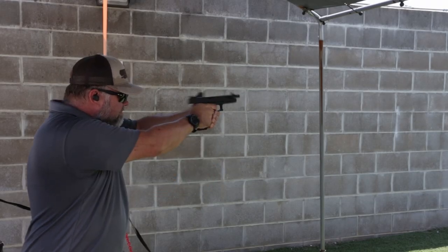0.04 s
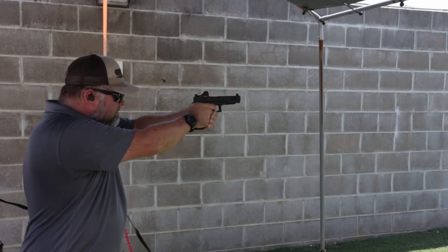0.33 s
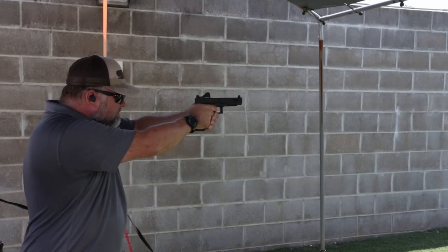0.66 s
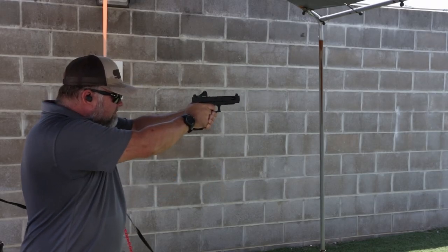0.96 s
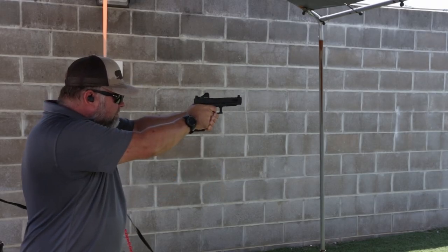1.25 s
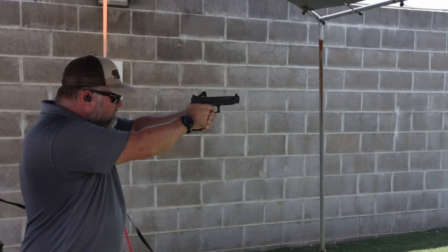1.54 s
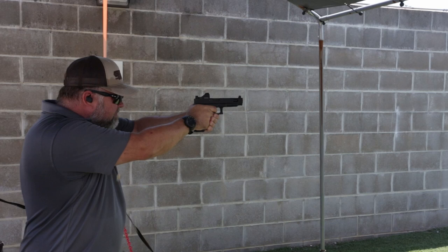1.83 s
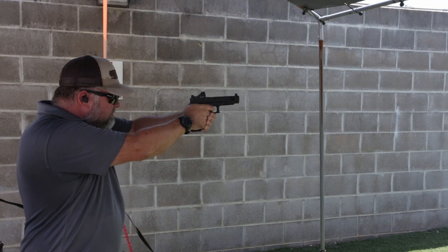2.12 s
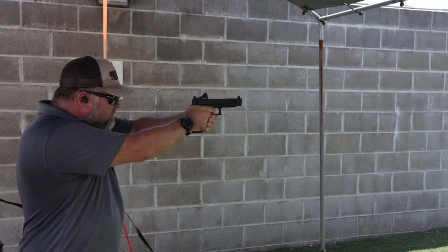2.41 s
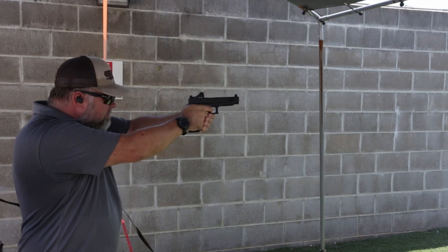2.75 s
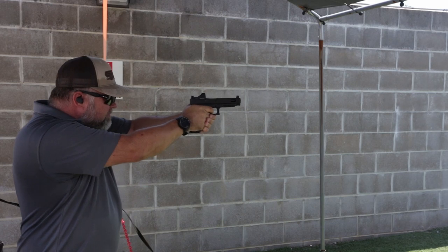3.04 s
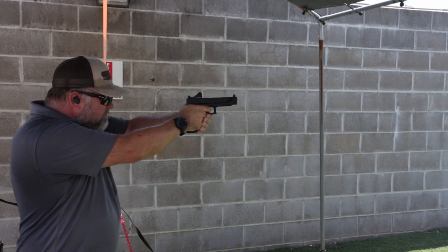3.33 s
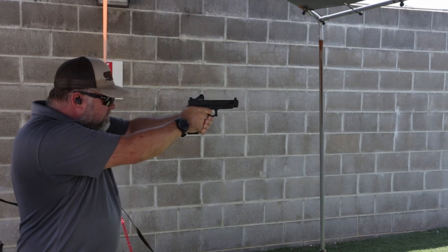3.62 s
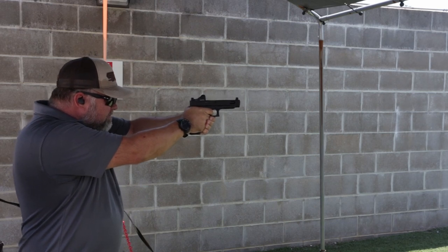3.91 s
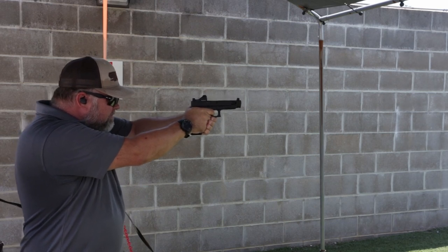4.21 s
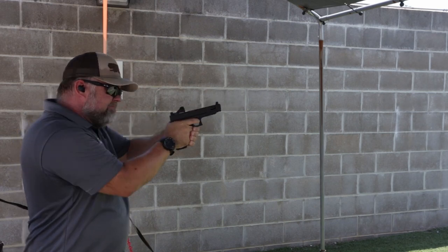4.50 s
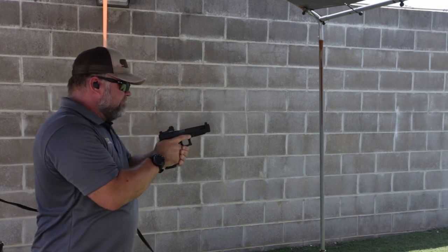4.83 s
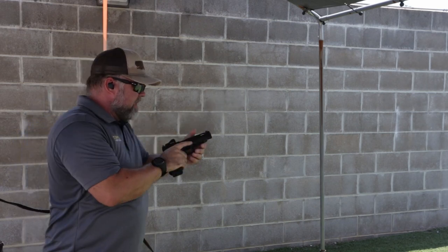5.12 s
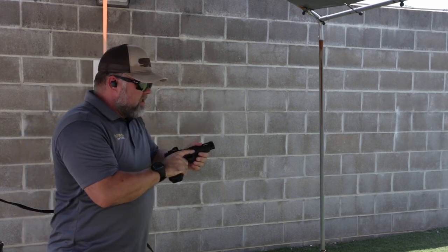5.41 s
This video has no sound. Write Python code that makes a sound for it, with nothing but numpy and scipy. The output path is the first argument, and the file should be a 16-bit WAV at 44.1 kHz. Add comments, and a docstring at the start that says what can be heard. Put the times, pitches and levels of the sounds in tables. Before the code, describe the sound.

A pistol fires six loud shots at a steady pace at a roofed outdoor range, each overloading the close microphone and echoing briefly off a wall. After every shot but the fifth, a steel plate rings, clanks onto its rack and bounces once. Then brass cases tinkle faintly on the ground, and the pistol is handled with a few soft knocks and a rub in light wind.

```python
"""Outdoor range, under a roof beside a block wall: six pistol shots at a rack of steel plates.
Five plates are hit: each rings while it tips over, clanks onto the rack and bounces once.
Brass cases tinkle on the ground, then the pistol is lowered and handled in a light wind.
The blasts overload the microphone and pull its gain control down."""
import sys
import numpy as np
from scipy import signal
from scipy.fft import irfft
from scipy.io import wavfile
from scipy.ndimage import map_coordinates

SR = 44100
rng = np.random.default_rng(int(sys.argv[2]) if len(sys.argv) > 2 else 0)


def to_wav(s):
    """Save 16-bit WAV."""
    ch = np.atleast_2d(s).T  # columns
    pcm = np.round(np.clip(ch, -1, 1) * 32767)  # PCM
    wavfile.write(sys.argv[1], SR, pcm.astype(np.int16))


N = 245195
TIME = np.arange(N) / SR

# Plates meeting the rack, landing and bounce in turn. Each row: start in s, crash level in dB, rise in s,
# t60 in s, clang in Hz, clang in dB re crash, plate's low mode in dB, upper modes in dB.
RACK_IMPACTS = [(.44, -16.5, 0.0016, 0.42, 9060, -18, -22, -30),
                (.572, -22.5, .011, 0.63, 9050, -27.5, -30, -28),
                (1.093, -17, .002, 0.45, 7430, -11, -27, -28.5),
                (1.195, -23, 0.0061, 0.53, 2380, -10.5, -28, -26.5),
                (1.659, -21.5, .0023, 0.6, 11520, -23, -18.5, -27.5),
                (1.78, -26.5, 0.0061, 0.33, 4050, -24, -32.5, -30.5),
                (2.264, -18, 0.0016, .36, 2710, -11.5, -24.5, -23.5),
                (2.376, -23, 0.021, 0.35, 7440, -15.5, -41.5, -39),
                (3.369, -19.5, 0.0028, 0.56, 7420, -17, -31, -28),
                (3.529, -26.5, .0055, 0.41, 2490, -14, -34, -30.5)]


def shots(blast_t60_s=0.21, puff_t60_s=0.011, puff_delay_s=0.0011, puff_push=0.22,
          reverb_db=-3, lumpy_db=1.5, chirp_db=-9, roof_db=-33, roof_t60_s=1.225):
    """Muzzle blast with dense near reflections and a swinging gas puff; range, wall and roof answer."""
    # Each row: start in s, blast in dB, tail in dB, puff in dB re blast, puff swing in Hz.
    rounds = [(0.0733, 5, -3, 2.5, 292), (0.761, 8, -2.5, 16, 199.4), (1.3834, 10, -5, 11.5, 180),
              (1.9928, 8.5, -4, 12.5, 310), (2.5635, 6.5, -4.5, 1, 404), (3.1310, 8, -2.5, -0.5, 404)]
    # Spectra. Each row: frequency in Hz, relative density in dB.
    blast_spectrum = [(40, -17), (150, -9.5), (400, -2.5), (900, -1.5), (2000, -3.5), (4000, -6.5),
                      (8000, -16.5), (16000, -41.5)]
    reverb_spectrum = [(40, -30), (120, -32.5), (250, 1), (600, 5.5), (1000, -1), (1500, -9), (2800, -9.5),
                       (5000, -12), (9000, -11), (16000, -17.5)]
    roof_spectrum = [(50, -23.5), (110, -6.5), (170, -2.5), (260, -4.5), (500, -29.5), (2000, -59)]
    # Decay of the range. Each row: frequency in Hz, t60 in s.
    reverb_decay = [(60, .4), (200, 0.33), (600, 0.43), (2500, 0.72), (6000, 0.51), (15000, 0.28)]
    out, t = np.zeros(N), TIME[:SR]
    for start_s, blast_db, tail_db, puff_db, puff_hz in rounds:
        blast = from_db(blast_db) * noise(blast_spectrum, SR) * fade(t, blast_t60_s)
        swing = np.sin(2 * np.pi * puff_hz * t) + puff_push
        puff = -from_db(blast_db + puff_db) * swing * fade(t, puff_t60_s)
        reverb = from_db(reverb_db + lumpy_db * drift(90, SR)) * noise(reverb_spectrum, SR, reverb_decay)
        chirp = from_db(chirp_db) * wall_chirp(t)
        roof = from_db(roof_db) * noise(roof_spectrum, SR) * fade(t, roof_t60_s)
        add(out, start_s, blast + from_db(tail_db) * (reverb + chirp + roof))
        add(out, start_s + puff_delay_s, puff)
    return out


def wall_chirp(t, start_hz=2198, end_hz=266.2, glide_s=0.068, width_hz=330, t60_s=0.48):
    """Rows of blocks scatter the blast back ever more obliquely: an echo that sinks in pitch."""
    hz = end_hz + (start_hz - end_hz) * np.exp(-t / glide_s)
    scatter = drift(width_hz, len(t)) + 1j * drift(width_hz, len(t))
    return np.real(scatter * np.exp(2j * np.pi * np.cumsum(hz) / SR)) * swell(t, glide_s, t60_s)


def plates(strike_rise_s=0.004, low_lobes=2.15, edge_on_db=5, upper_offset_lobes=0.19,
           landed_t60_s=0.17, settle_s=0.045, rest_t60_s=0.17, high_db=-38, top_db=-42):
    """A bullet rings a plate and tips it at a steady rate, sweeping its lobes past the microphone."""
    # Each row: low mode, upper mode and its twin in Hz, twin in dB re upper, high and top modes in Hz.
    plate_modes = [(2964, 4800, 4875, -8, 7400, 10460), (2820, 4870, 4745, -1.5, 7397, 10240),
                   (2911, 4806, 4830, -4.5, 7698, 10300), (2908, 4885, 4655, -4, 7480, 10440),
                   (2870, 4820, 5700, -11, 7920, 10380)]
    # Each row: start in s, low mode in dB, its t60 in s, upper modes in dB, their t60 in s,
    # upper lobes passing during the fall, roughness 0-1.
    bullet_hits = [(.148, -22, 1.57, -26, 2.4, 1.3, 0.28), (.834, -25.5, 1.74, -17.5, 1.1, 2.61, 0.3),
                   (1.466, -22, 1.2, -12.5, 3, 1.4, 0.4), (2.072, -33, .4, -14.5, .6, 2.32, 0.48),
                   (3.2, -26, .2, -19.5, .36, 1.1, 0.7)]
    out, t = np.zeros(N), TIME[:SR]
    for modes, hit, landing, bounce in zip(plate_modes, bullet_hits, RACK_IMPACTS[::2],
                                           RACK_IMPACTS[1::2]):
        low_hz, upper_hz, twin_hz, twin_db, high_hz, top_hz = modes
        start_s, low_db, low_t60_s, upper_db, upper_t60_s, upper_lobes, rough = hit
        fall_s = landing[0] - start_s
        tipped = np.minimum(t / fall_s, 1)   # 0 upright, 1 down on the rack
        rack_damping = fade(np.maximum(t - fall_s, 0), landed_t60_s)
        low_beam = lobes(low_lobes * tipped, gap_db=-10) * from_db(edge_on_db * tipped ** 2)
        upper_beam = lobes(upper_lobes * tipped - upper_offset_lobes, gap_db=-13)
        low_env = from_db(low_db) * swell(t, strike_rise_s, low_t60_s) * low_beam * rack_damping
        upper_env = from_db(upper_db) * swell(t, strike_rise_s, upper_t60_s) * upper_beam * rack_damping
        # Landing and bounce restrike the low mode and shake the upper modes of all five plates.
        shaken_env = 0
        for touch_s, *_, restrike_db, shake_db in (landing, bounce):
            since_s = start_s + t - touch_s
            restrike = from_db(restrike_db) * swell(since_s, rise_s=0.035, t60_s=0.78)
            shake = from_db(shake_db) * swell(since_s, rise_s=0.018, t60_s=0.55)
            low_env = np.hypot(low_env, restrike)
            shaken_env = np.hypot(shaken_env, shake)
        pair = unit_rms(wavering(upper_hz, rough, SR) + from_db(twin_db) * wavering(twin_hz, rough, SR))
        all_plates = unit_rms(sum(wavering(hz, rough=0.5, size=SR) for _, hz, *_ in plate_modes))
        high = from_db(high_db) * narrow_band(high_hz, 130, SR)
        top = from_db(top_db) * narrow_band(top_hz, 260, SR)
        sheen = (high + top) * fade(t, t60_s=0.69)
        ring = low_env * wavering(low_hz, rough, SR) + upper_env * pair + shaken_env * all_plates + sheen
        settling = fade(np.maximum(start_s + t - bounce[0] - settle_s, 0), rest_t60_s)
        add(out, start_s, ring * settling)
    return out


def lobes(turns, gap_db):
    """A mode radiates in lobes, one per turn; reflections fill the gaps."""
    return np.hypot(np.cos(np.pi * turns), from_db(gap_db))


def wavering(hz, rough, size):
    """Mode of a swinging plate: a sine wavering in level and phase; rms 1."""
    wobble = 1 + rough * (0.5 * drift(90, size) + 1j * drift(70, size))
    return unit_rms(np.real(wobble * np.exp(2j * np.pi * hz * TIME[:size])))


def rack(frame_db=-3, frame_t60_ratio=0.8, rattle_db=-4, rough_db=2.5,
         shimmer_db=-13, shimmer_t60_s=0.31, clang_t60_s=0.42):
    """A plate hits the steel frame: dense frame modes, sparse high shimmer, a rattle and one clang."""
    # Steel on steel, and the rack's high modes. Each row: frequency in Hz, relative level in dB.
    crash_spectrum = [(150, -30), (350, -20), (650, -10), (1300, -3), (2700, 1.5), (4000, -2), (5000, 1),
                      (6500, -13.5), (8000, -6), (10500, -16.5), (13500, -25), (16000, -33.5)]
    shimmer_spectrum = [(5600, 3.5), (8500, -3), (10500, -3.5), (12500, -12.5), (14600, -12.5)]
    size = SR * 2 // 3
    out, t = np.zeros(N), TIME[:size]
    shimmer_hz = np.linspace(5600, 14600, 30) + rng.uniform(-110, 110, 30)
    for start_s, level_db, rise_s, t60_s, clang_hz, clang_db, *_ in RACK_IMPACTS:
        frame_hz = rng.uniform(500, 11000, 130)
        frame = from_db(frame_db) * sines(frame_hz, crash_spectrum, size)
        frame *= fade(t, t60_s * frame_t60_ratio)
        shimmer = from_db(shimmer_db) * sines(shimmer_hz, shimmer_spectrum, size) * fade(t, shimmer_t60_s)
        rattle_env = from_db(rattle_db + rough_db * drift(200, size)) * fade(t, t60_s)
        rattle = rattle_env * noise(crash_spectrum, size, tilt_db_per_oct=-2)
        clang_tone = np.sin(2 * np.pi * clang_hz * t) + 0.81 * narrow_band(clang_hz, 90, size)
        clang = from_db(clang_db) * clang_tone * fade(t, clang_t60_s)
        add(out, start_s, from_db(level_db) * (frame + shimmer + rattle + clang) * rise(t, rise_s))
    return out


def cases(tick_t60_s=0.0084, second_end_db=-5, second_end_s=0.0055, echo_db=-14, echo_t60_s=0.18,
          clink_db=-12, clink_hz=5200, clink_t60_s=0.16, ring_t60_s=0.33, blur=0.87):
    """A brass case lands on one end, then the other, clinks and rings on with one thin high note."""
    # Each row: start in s, tick in dB, ring in dB, ring in Hz, rise in s.
    landings = [(1.589, -44, -64, 9650, .0003), (3.692, -40, -53.5, 10030, 0.0008),
                (3.866, -40, -54, 9880, 0.00038), (4.379, -48.5, -67.5, 9830, 0.01),
                (4.63, -54.5, -55.5, 9850, 0.004), (4.71, -57, -63, 9940, 0.0041),
                (4.757, -49, -55, 9900, 0.03)]
    # Each row: frequency in Hz, relative density in dB.
    tick_spectrum = [(1500, -20.5), (4300, -7), (5300, -0.5), (7500, -13.5), (11000, -6.5), (16000, -22)]
    out, t = np.zeros(N), TIME[:SR // 2]
    second_end = from_db(second_end_db) * (t > second_end_s) * fade(np.abs(t - second_end_s), tick_t60_s)
    tick_env = 2 * (fade(t, tick_t60_s) + second_end) + from_db(echo_db) * fade(t, echo_t60_s)
    for start_s, tick_db, ring_db, ring_hz, rise_s in landings:
        tick = noise(tick_spectrum, len(t)) * tick_env
        clink = from_db(clink_db) * narrow_band(clink_hz, 1200, len(t)) * fade(t, clink_t60_s)
        tone = np.sin(2 * np.pi * ring_hz * t) + blur * narrow_band(ring_hz, 220, len(t))
        ring = from_db(ring_db) * tone * fade(t, ring_t60_s)
        add(out, start_s, (from_db(tick_db) * (tick + clink) + ring) * rise(t, rise_s))
    return out


def knocks(rise_s=0.0041, thud_db=-2, hollow_db=-3):
    """Hollow knocks and clicks of the handled pistol, smeared by wall and roof."""
    # Each row: start in s, level in dB, t60 in s, thud tilt in dB per octave.
    contacts = [(4.198, -51.5, 0.12, -3.5), (4.484, -39, 0.14, -1), (5.165, -58.5, 0.21, 7),
                (5.288, -60, .06, 8), (5.467, -43.5, 0.15, 6.3)]
    # Each row: frequency in Hz, relative density in dB.
    thud_spectrum = [(50, -10.5), (130, 2.5), (400, -15.5), (1000, 1), (2200, -7), (3500, -11.5),
                     (5500, -18), (7500, -32), (16000, -41)]
    # Each row: frequency in Hz, width before broadening in Hz, relative level in dB.
    hollow_modes = [(1038, 45, 11.5), (1320, 50, 6), (1590, 55, 5), (1860, 60, 11.5), (2050, 79, 6),
                    (2480, 28, 6), (3070, 50, 0), (5300, 130, -3)]
    out, t = np.zeros(N), TIME[:SR // 2]
    for start_s, level_db, t60_s, tilt in contacts:
        thud = from_db(thud_db) * noise(thud_spectrum, len(t), tilt_db_per_oct=tilt)
        hollow = from_db(hollow_db) * resonances(hollow_modes, len(t), broadening=3)
        add(out, start_s, from_db(level_db) * (thud + hollow) * swell(t, rise_s, t60_s))
    return out


def scrape(start_s=5.165, level_db=-67.5, grain_db=2, stroke_db=2):
    """Hands rub over the pistol and excite its resonances."""
    # Each row: frequency in Hz, width in Hz, relative level in dB.
    pistol_modes = [(1880, 260, 2.5), (2350, 380, 0.5), (3710, 450, -4), (4980, 800, -5.5), (5600, 900, -6),
                    (7450, 3000, -8)]
    friction_db = level_db + grain_db * drift(120, N) + stroke_db * drift(22, N)
    return (TIME > start_s) * from_db(friction_db) * resonances(pistol_modes, N)


def pops(swing_hz=420, t60_s=0.0031):
    """Soft pops on the microphone, each one dull, heavily damped swing."""
    # Each row: start in s, level in dB.
    pop_events = [(3.848, -37), (3.937, -35), (3.9837, -37), (4.017, -36.5), (4.065, -42.5), (4.357, -35),
                  (4.42, -34), (4.805, -37), (4.82, -36), (4.954, -39)]
    out, t = np.zeros(N), TIME[:SR // 20]
    for start_s, level_db in pop_events:
        add(out, start_s, from_db(level_db) * np.sin(2 * np.pi * swing_hz * t) * fade(t, t60_s))
    return out


def wind(eddy_db=-5, lumpy_db=3, buffet_db=-3, buffet_hz=330, buffets_per_s=110,
         calm_db=-73, gust_rise_s=0.023, gust_t60_s=0.35):
    """Eddies and single buffets on the microphone; gusts rise, hold and die over a steady breeze."""
    # Each row: start in s, length in s, level in dB.
    gusts = [(0, 0.46, -56.5), (3.72, 0.07, -55), (4.169, 0.17, -62), (4.332, 0.2, -56.5),
             (4.809, 0.05, -53), (4.938, 0.6, -57.5)]
    # Each row: frequency in Hz, relative density in dB.
    eddy_spectrum = [(15, -35), (25, 2), (118, 4), (365, 1), (983, -8.5), (1210, -16), (1300, -6),
                     (1600, -38), (2080, -47), (3520, -120)]
    kicks = (rng.random(N) < buffets_per_s / SR) * rng.uniform(-1, 1, N)
    buffets = unit_rms(signal.sosfilt(signal.butter(2, buffet_hz, fs=SR, output="sos"), kicks + 1e-18))
    eddies = from_db(eddy_db + lumpy_db * drift(110, N)) * noise(eddy_spectrum, N)
    power = from_db(calm_db) ** 2
    for start_s, length_s, level_db in gusts:
        onset = np.clip((TIME - start_s) / gust_rise_s, 0, 1)
        decay = fade(np.maximum(TIME - start_s - length_s, 0), gust_t60_s)
        power = power + (from_db(level_db) * onset * decay) ** 2
    return np.sqrt(power) * (eddies + from_db(buffet_db) * buffets)


def ambience(whine_hz=1930, whine_db=-81.5):
    """Smooth outdoor hiss and a faint far whine."""
    # Each row: time in s, level in dB.
    hiss_levels = [(0, -66), (2.9, -70), (3.1, -63.5), (4.0, -76), (4.8, -75.5), (5.25, -69), (5.56, -64.5)]
    # Each row: frequency in Hz, relative density in dB.
    hiss_spectrum = [(100, -0.5), (1000, -1.5), (2200, -2), (4000, -7), (8000, -12), (16000, -17)]
    whine = from_db(whine_db) * narrow_band(whine_hz, 190, N)
    return from_db(over_time(hiss_levels)) * noise(hiss_spectrum, N) + whine


def noise(spectrum, size, decay=None, tilt_db_per_oct=0):
    """Half-octave noise bands, starting near rms 1 in sum; a decay table gives each band its t60."""
    edges_hz = np.geomspace(25, 18000, 20)
    centres_hz = np.sqrt(edges_hz[1:] * edges_hz[:-1])
    white = rng.standard_normal((2, size))
    gains = from_db(at_hz(spectrum, centres_hz) + tilt_db_per_oct * np.log2(centres_hz))
    gains /= np.sqrt(np.sum(gains ** 2 * np.diff(edges_hz)) * 2 / SR)
    out = np.zeros(size)
    for k, hz in enumerate(centres_hz):
        bandpass = signal.butter(2, edges_hz[k:k + 2], "band", fs=SR, output="sos")
        envelope = 1 if decay is None else fade(TIME[:size], at_hz(decay, hz))
        out += gains[k] * signal.sosfilt(bandpass, white[k % 2]) * envelope
    return out


def narrow_band(hz, width_hz, size):
    """A resonance blurred by reflections; rms 1."""
    blur = drift(width_hz, size) + 1j * drift(width_hz, size)
    return unit_rms(np.real(blur * np.exp(2j * np.pi * hz * TIME[:size])))


def resonances(modes, size, broadening=1):
    """A few damped resonances shaken by friction or a knock; rms 1."""
    return unit_rms(sum(from_db(db) * narrow_band(hz, broadening * width_hz, size)
                        for hz, width_hz, db in modes))


def sines(hz, spectrum, size):
    """Many modes struck at once, random in phase, levels scattered about a spectrum; rms 1."""
    levels_db = at_hz(spectrum, hz) + 2 * rng.standard_normal(len(hz))
    lines = np.zeros(SR // 2 + 1, complex)
    lines[hz.astype(int)] = from_db(levels_db) * np.exp(2j * np.pi * rng.random(len(hz)))
    return unit_rms(irfft(lines)[:size])


def drift(rate_hz, size):
    """Smooth random curve, spread about 1."""
    knots = rng.standard_normal(16384)
    return map_coordinates(knots, [np.arange(size) * rate_hz / SR], order=2, mode="wrap")


def rise(t, rise_s):
    """Exponential approach from 0 to 1."""
    return 1 - np.exp(-t / rise_s)


def fade(t, t60_s):
    """Exponential decay, 60 dB down at t60_s."""
    return np.exp(-np.log(1000) * t / t60_s)


def swell(t, rise_s, t60_s):
    """Silent before t = 0, then rise and decay."""
    t = np.maximum(t, 0)
    return rise(t, rise_s) * fade(t, t60_s)


def smooth(x, lag_s):
    """One-pole lag that starts settled."""
    pole = np.exp(-1 / (lag_s * SR))
    return signal.lfilter([1 - pole], [1, -pole], x - x[0]) + x[0]


def from_db(db):
    """Decibels to gain."""
    return 10 ** (np.asarray(db) / 20)


def unit_rms(x):
    """Scale to rms 1."""
    return x / np.sqrt(np.mean(x ** 2) + 1e-20)


def over_time(points):
    """Read a table at every sample time."""
    return np.interp(TIME, *np.transpose(points))


def at_hz(points, hz):
    """Read a table on a log-frequency axis."""
    points_hz, values = np.transpose(points)
    return np.interp(np.log(hz), np.log(points_hz), values)


def add(out, start_s, sound):
    """Mix a sound in from start_s on."""
    i = max(int(start_s * SR), 0)
    out[i:i + len(sound)] += sound[:max(N - i, 0)]


def scene():
    """Everything that reaches the microphone, in mono."""
    return (shots() + plates() + rack() + cases() + knocks() + scrape() + pops() + wind()
            + ambience())[None]


def gain_control(x, target_db=-9.5, max_gain_db=20, start_gain_db=12,
                 release_db_per_s=13, sense_s=0.0013, attack_s=0.00079):
    """Gain drops within milliseconds of a loud sound and creeps back."""
    # The control reacts sooner as the shots go on. Each row: time in s, lag in s.
    reaction_lags = [(.77, .0057), (1.7, .0013), (2.56, .0002)]
    level_db = 10 * np.log10(smooth(x ** 2, sense_s) + 1e-12)
    release_db = release_db_per_s * TIME
    held_db = np.maximum.accumulate(np.maximum(level_db + release_db, target_db - start_gain_db))
    held_db -= release_db
    gain_db = smooth(np.minimum(target_db - held_db, max_gain_db), attack_s)
    return x * from_db(np.interp(TIME - over_time(reaction_lags), TIME, gain_db))


def record(dry, saturation=0.34, low_cut_hz=35, high_cut_hz=15900):
    """The microphone saturates; then low cut, gain control, converter clipping and high cut."""
    x = dry[0] / (1 + (dry[0] / saturation) ** 4) ** (1 / 4)
    x = signal.sosfilt(signal.butter(1, low_cut_hz, "high", fs=SR, output="sos"), x)
    x = np.clip(gain_control(x), -1, 1)
    x = signal.sosfilt(signal.ellip(14, 0.1, 70, high_cut_hz, fs=SR, output="sos"), x)
    return np.clip(x, -1, 1)[None]


dry = scene()
out = record(dry)
to_wav(out)
```